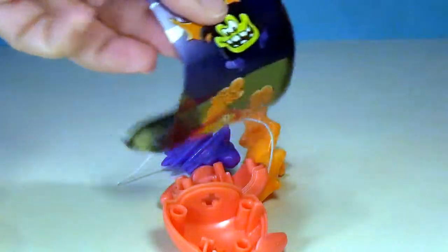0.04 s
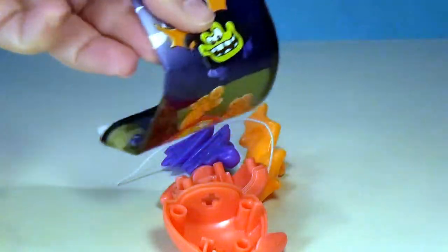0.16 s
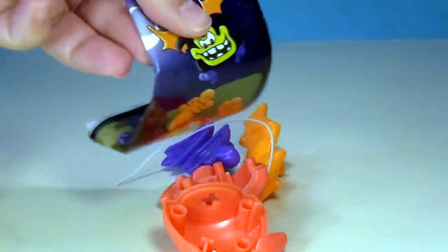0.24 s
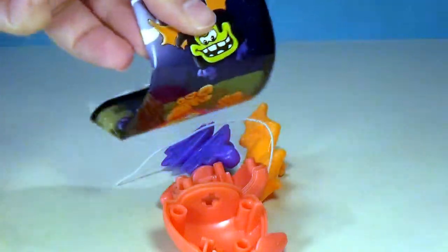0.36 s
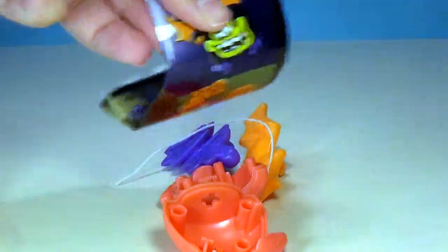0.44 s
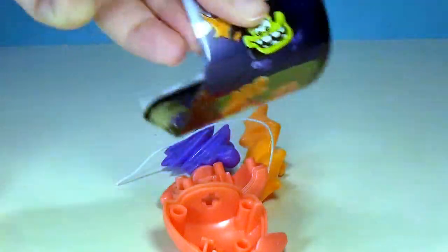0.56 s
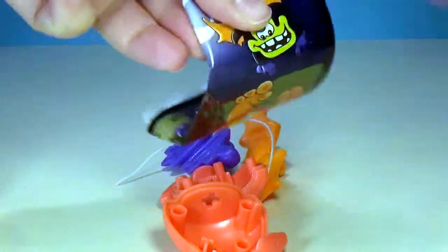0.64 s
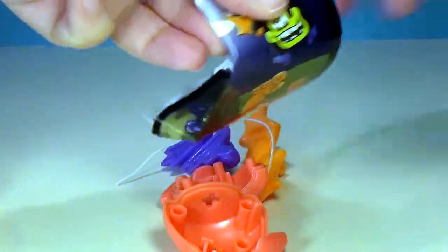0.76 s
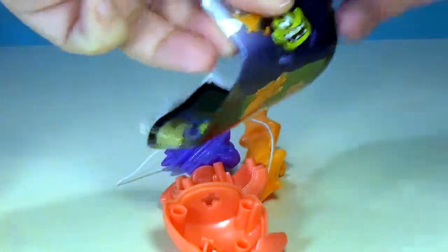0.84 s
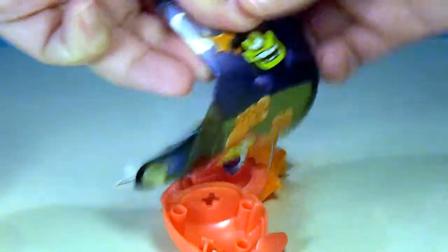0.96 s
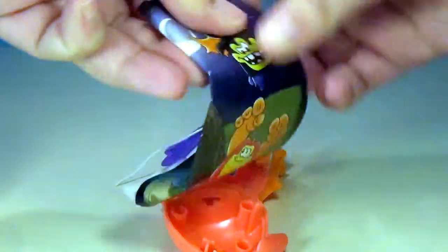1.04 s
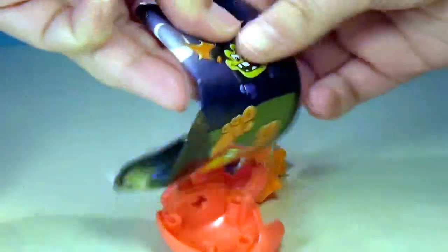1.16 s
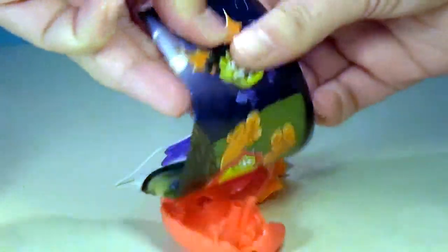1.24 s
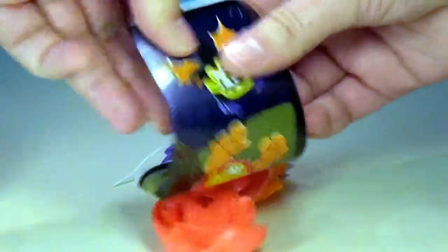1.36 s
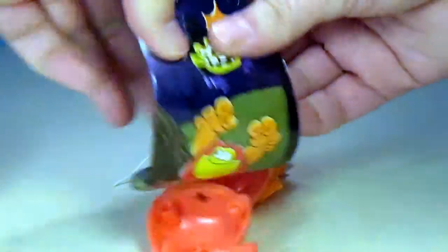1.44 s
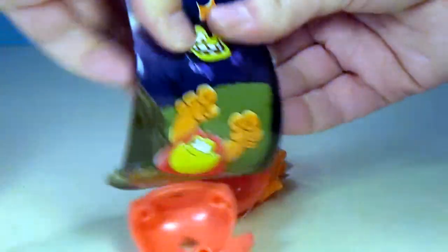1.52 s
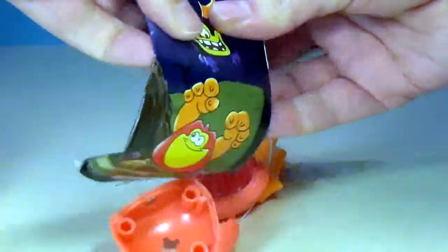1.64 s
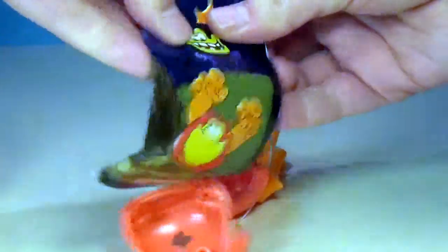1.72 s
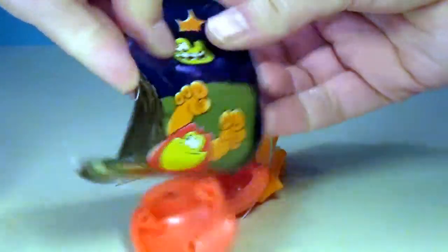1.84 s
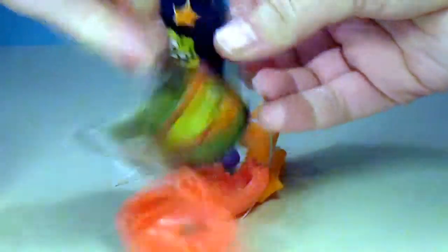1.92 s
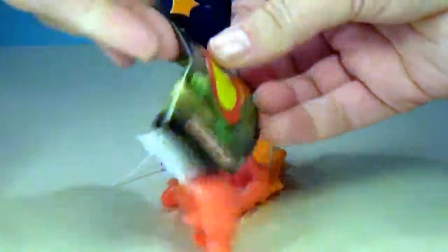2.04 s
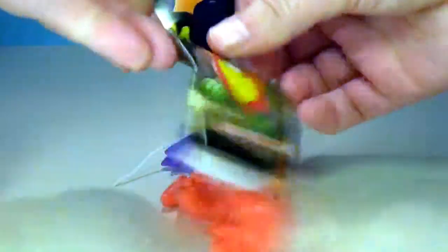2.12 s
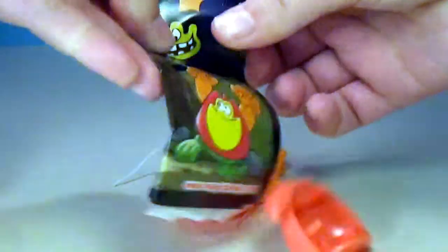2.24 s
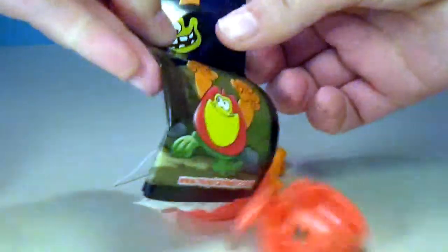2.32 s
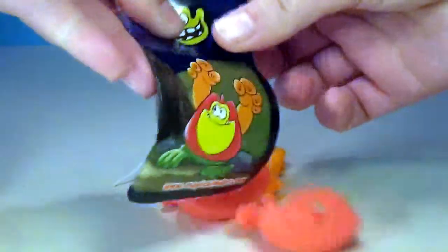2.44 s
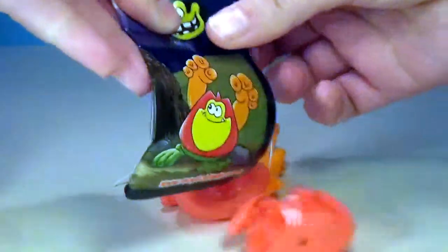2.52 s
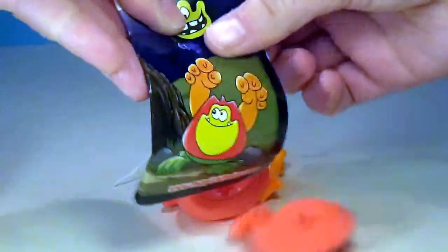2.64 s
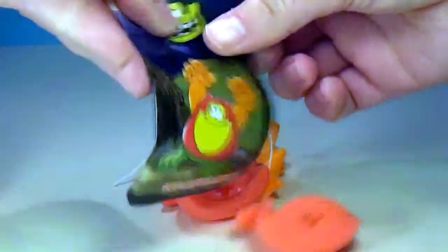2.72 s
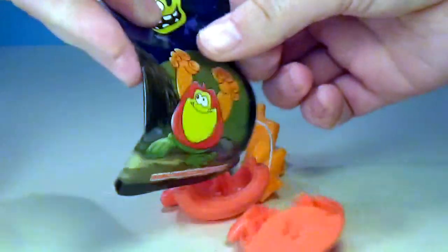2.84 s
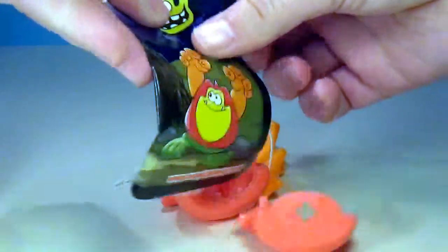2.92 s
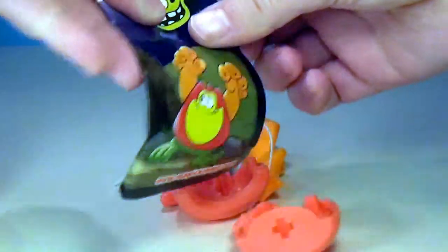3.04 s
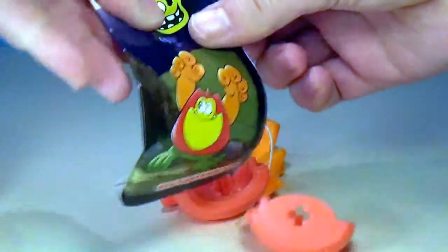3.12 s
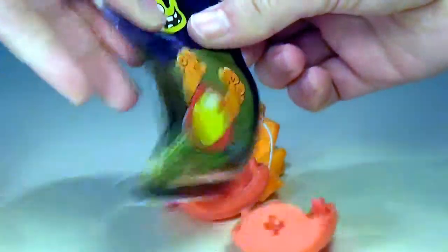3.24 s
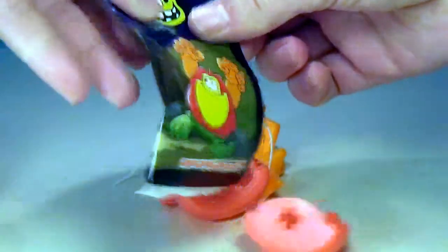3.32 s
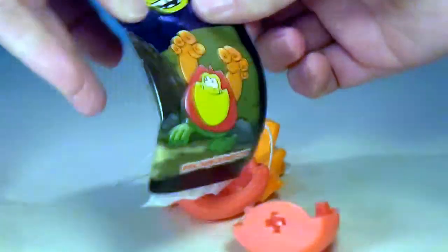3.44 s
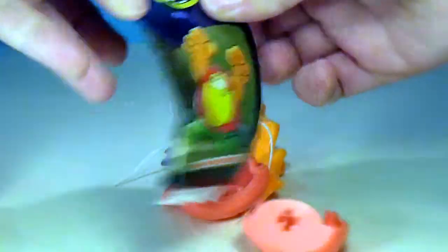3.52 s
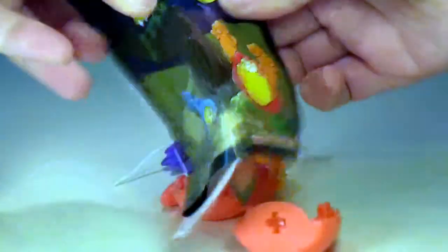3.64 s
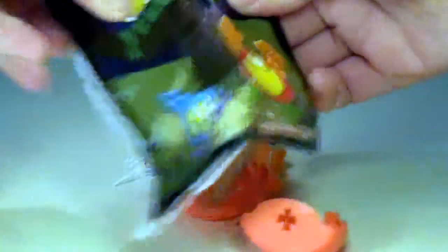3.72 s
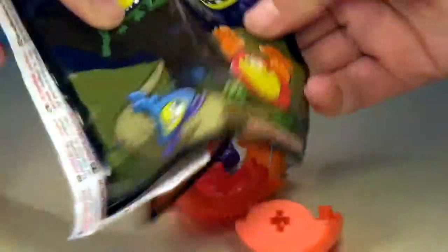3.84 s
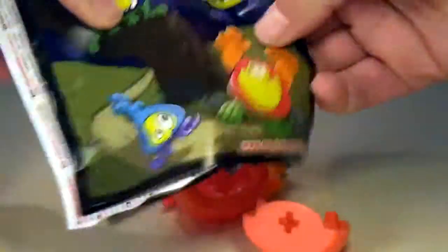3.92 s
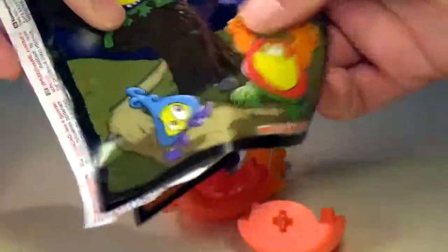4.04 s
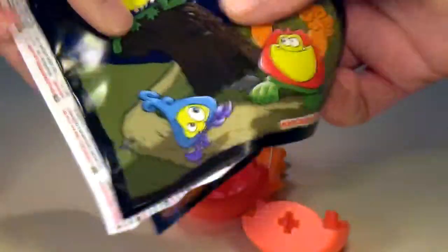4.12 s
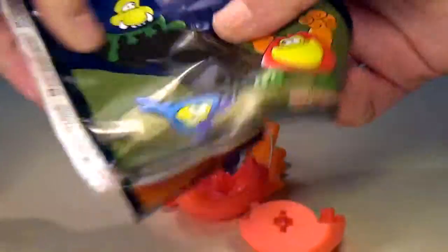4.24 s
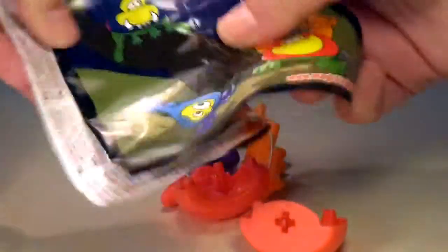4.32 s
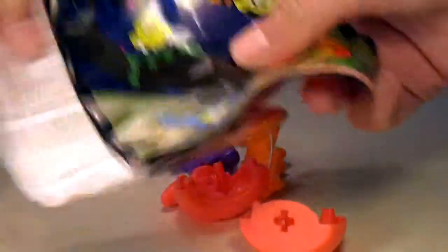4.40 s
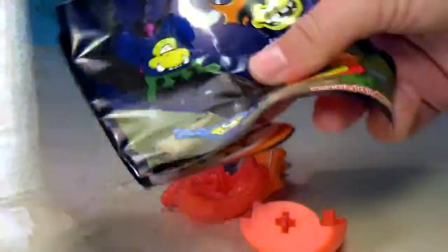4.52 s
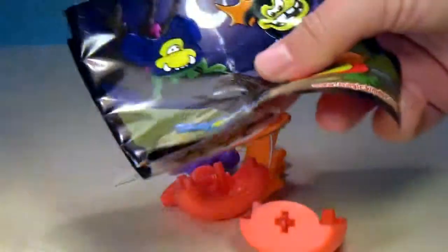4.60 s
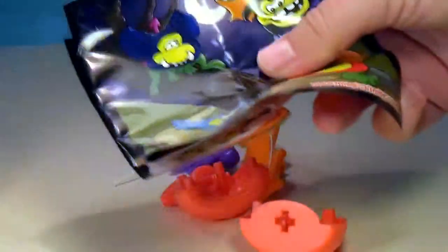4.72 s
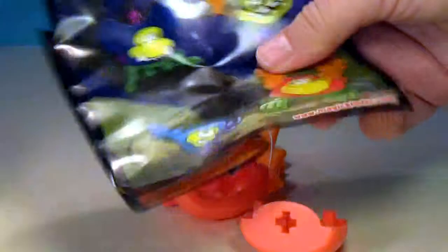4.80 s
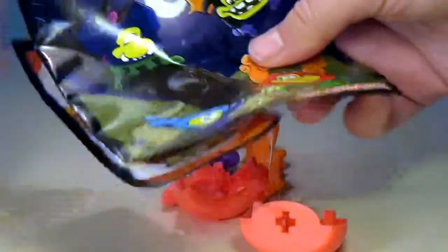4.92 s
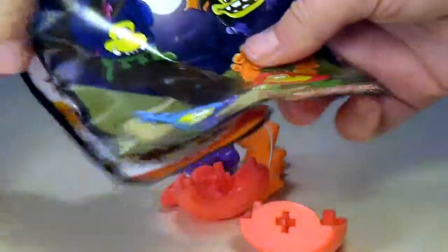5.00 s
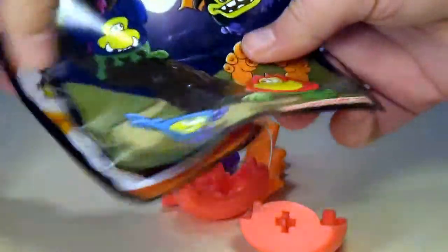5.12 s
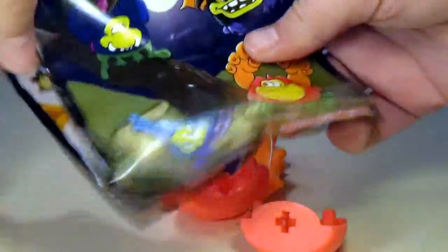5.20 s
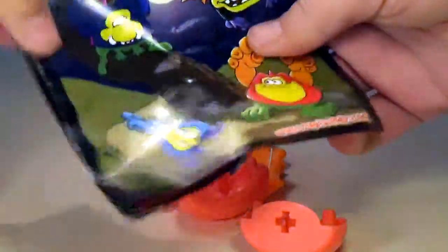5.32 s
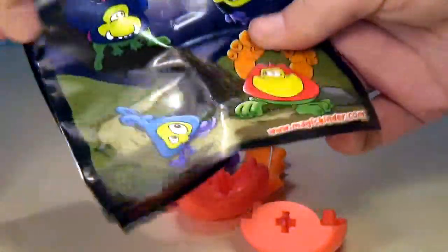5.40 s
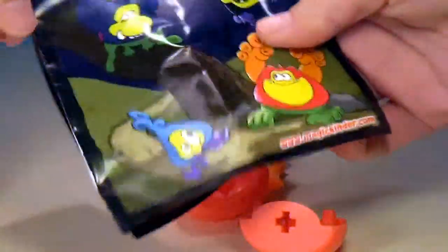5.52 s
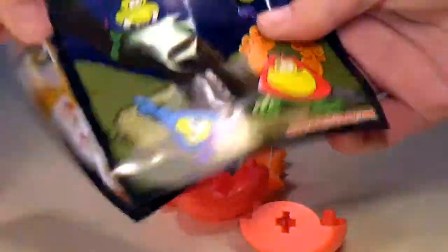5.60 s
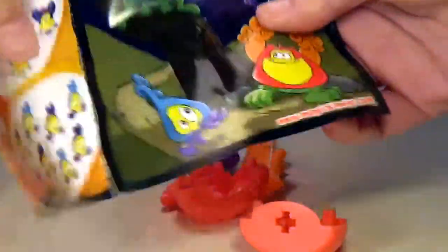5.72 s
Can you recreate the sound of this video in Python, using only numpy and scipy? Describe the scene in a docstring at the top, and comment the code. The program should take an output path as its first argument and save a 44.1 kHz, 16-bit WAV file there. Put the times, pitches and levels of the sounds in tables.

```python
"""Handling a foil-plastic bag

Hands turn and bend a stiff foil-plastic toy bag close to a small stereo microphone, over a table with toy parts.
Snapping creases and clacks are bursts of filtered noise; sliding fingers are granular friction noise.
The flexing panels and the bumps on the table are sums of damped modes.
A small room answers with decaying noise, over a faint steady hiss."""
import sys
import numpy as np
from scipy import signal
from scipy.fft import rfft, irfft, next_fast_len
from scipy.io import wavfile
from scipy.ndimage import map_coordinates

SR = 44100
rng = np.random.default_rng(int(sys.argv[2]) if len(sys.argv) > 2 else 0)


def transcribe(signal):
    """Save signal, clipped to [-1, 1], as a 16-bit WAV file at the path in sys.argv[1]."""
    frames = np.atleast_2d(signal).T
    limited = np.clip(frames, -1, 1)
    pcm = np.round(limited * 32767).astype(np.int16)
    wavfile.write(sys.argv[1], SR, pcm)


N = 254016

# creases snapping through: t/s, relative level/dB, resonance f/Hz, hollow part/dB, bright part/dB
SNAPS = [(0.35, -47.5, 2390, -5, -5), (0.497, -45, 8350, 1.5, 0), (0.547, -45, 1020, 1.5, -9),
         (0.584, -46.5, 3900, -4, 0.5), (1.012, -35, 7650, -0.5, -3.5), (1.154, -36, 5750, -1.5, -9),
         (1.306, -34.5, 1960, -3, -0.5), (1.322, -33, 1050, -0.5, -17), (1.666, -31, 3920, -7, 0),
         (1.678, -24.5, 6800, 6.5, 1), (1.8275, -13.5, 4300, -7, -7.5), (1.8536, -14.5, 6360, -15, -4),
         (1.8649, -28, 6910, 9.5, 10.5), (2.032, -18.5, 5960, 1.5, -0.5), (2.047, -26.5, 6330, 4, 6),
         (2.073, -30, 1910, -2, -5), (2.13, -34, 9800, -1, 5), (2.259, -26, 3360, -3.5, 0),
         (2.27, -33.5, 6360, 4, 7), (2.298, -30, 6200, 2, 0), (2.418, -38, 2460, 2.5, -3),
         (2.497, -35.5, 1400, 5.5, 2.5), (2.837, -23, 6900, -1, 6.5), (2.8444, -27, 7000, -13, 0),
         (2.8568, -16, 6070, -15, -3.5), (2.973, -29.5, 8100, -10, 0.5), (3.193, -35.5, 2700, -10, 0.5),
         (3.265, -35.5, 6160, -5, -3), (3.330, -29.5, 9900, -6, 0), (3.381, -30, 2330, -4, 4.5),
         (3.435, -30.5, 5900, -12, 14), (3.452, -24.5, 6830, 2, 6), (3.4831, -19.5, 5730, -4.5, -1.5),
         (3.643, -33, 9400, -1, 9.5), (3.677, -26, 6160, -5, -5), (3.6935, -12, 5900, -5.5, 0),
         (3.886, -27.5, 6350, -4, 2), (3.903, -30, 6070, -6, -7), (3.926, -29.5, 4700, -3, -6),
         (3.996, -29, 9800, 2, 3), (4.064, -29, 2400, -8, -16), (4.185, -23, 9200, -1.5, -4.5),
         (4.3486, -18.5, 2760, -4.5, -3), (4.3932, -25, 2900, 2.5, -8.5), (4.516, -30, 2680, -21, -3),
         (4.604, -30.5, 2460, 0, -3), (4.770, -38.5, 5840, -7, 6), (4.8757, -25, 3040, -27, -2),
         (4.909, -29, 7800, -17, 2), (5.083, -35.5, 9750, -7, 2.5), (5.264, -34.5, 2650, -2.5, 0),
         (5.2879, -14.5, 2650, -30, -6), (5.437, -39.5, 8350, 1, -1), (5.497, -38, 2550, -4, -12),
         (5.531, -40.5, 3510, -4, -20), (5.618, -15.5, 3120, -6.5, -9.5), (5.717, -17, 4360, -9, -9)]
REFERENCE_SNAP_DB = -16  # table level of the snap from which duration and recoil are scaled


def amp(db):
    """Level definition: an amplitude ratio is 10 to the power dB/20."""
    return 10 ** (np.asarray(db) / 20)


def unit(x):
    """Normalisation: scale to a root-mean-square value of 1."""
    return x / np.sqrt(np.mean(x ** 2) + 1e-20)


def along(points, hz):
    """Logarithmic frequency scale: interpolate (f/Hz, value) points over log frequency."""
    f, values = np.transpose(points)
    return np.interp(np.log(hz + 1), np.log(f + 1), values)


def curves(rows):
    """Linear interpolation in time: one value per sample for each column after t/s."""
    times, *columns = np.transpose(rows)
    return [np.interp(np.arange(N) / SR, times, column) for column in columns]


def wobble(rate):
    """Slow random modulation: a smooth curve through `rate` random knots per second."""
    knots = rng.standard_normal(int(N * rate / SR) + 4)
    return map_coordinates(knots, [np.arange(N) * rate / SR])


def filtered(x, response):
    """Linear filtering: multiply the spectrum of x by a response of frequency."""
    n = x.shape[-1]
    size = next_fast_len(n + 8192)
    spectrum = rfft(x, size) * response(np.fft.rfftfreq(size, 1 / SR))
    return irfft(spectrum, size)[..., :n]


def causal(gain):
    """Minimum phase: folding the cepstrum of a gain gives its causal response."""
    cepstrum = irfft(np.log(np.maximum(gain, 1e-6)))
    half = len(cepstrum) // 2
    cepstrum[1:half] *= 2
    cepstrum[half + 1:] = 0
    return np.exp(rfft(cepstrum))


def ports(pair):
    """Interchannel coherence: mix two unrelated signals to a set left-right likeness at each frequency."""
    # f/Hz, left-right correlation
    likeness = [(100, 0.75), (2000, 0.77), (3500, 0.86), (6000, 0.38), (11000, 0.47)]

    def mid_side(hz):
        angle = np.arccos(np.clip(along(likeness, hz), -1, 1)) / 2
        return np.array([np.cos(angle), np.sin(angle)])

    mid, side = filtered(pair, mid_side)
    return np.array([mid + side, mid - side])


def coloured(pair, spectrum):
    """Spectral shaping: filter a pair to the given spectrum, as stereo of rms 1."""
    return unit(ports(filtered(pair, lambda hz: amp(along(spectrum, hz)))))


def add(track, s, sound):
    """Superposition: sum a sound into a track from time s."""
    part = track[..., max(round(s * SR), 0):][..., :sound.shape[-1]]
    part += sound[..., :part.shape[-1]]


def add_centred(track, s, sound):
    """Superposition about an instant: sum a sound with its middle at time s."""
    add(track, s - sound.shape[1] / 2 / SR, sound)


def ring(modes, t, scatter):
    """Modal decay: damped sines whose pitch and strength the grip shifts at every blow."""
    total = 0
    for hz, db, t60 in modes:
        envelope = amp(db + rng.normal(0, 0.97) - 60 * t / t60)
        shifted_hz = hz * (1 + scatter * rng.normal())
        total = total + envelope * np.sin(2 * np.pi * shifted_hz * t)
    return total


def small_radiator(x, low_hz=85):
    """Radiation cut-off: small surfaces hardly radiate the deepest bass; the right channel is stronger."""
    highpass = signal.butter(2, low_hz, "highpass", fs=SR, output="sos")
    return signal.sosfilt(highpass, x) * amp([[-1.2], [1.2]])


def burst(db, rise, fall, ring_hz, hollow, bright, ring_db=5, ring_width=0.13, hollow_db=-1):
    """Transient excitation of a resonator: a noise pulse rings the film, centred in the returned sound."""
    # ringing film: f/Hz, relative spectral density/dB
    film_spectrum = [(150, -16.5), (400, -1), (650, 1), (1000, 5.5), (1300, 8), (1900, 2), (3000, 3.5),
                     (6000, 6), (9500, 3.5), (11200, 0.5)]
    sharp_share, sharp_db = 0.38, 1.5  # the upper middle partly follows the bright part
    size = 4096
    t = (np.arange(size) - size / 2) / SR
    hz = np.fft.rfftfreq(size, 1 / SR)
    core = (hz > 2200) & (hz < 6500)  # the band whose strength is set
    pulse = np.exp(-np.logaddexp(-t / rise, t / fall))
    # wide creases sound hollow, tight ones bright, and each has one strongest resonance
    tilt = [(800, min(hollow, 0)), (1400, hollow + hollow_db), (2400, 0), (3500, 0),
            (5100, sharp_db + sharp_share * bright), (8000, bright)]
    resonance = ring_db / (1 + ((hz / ring_hz - 1) / ring_width) ** 2)
    response = causal(amp(along(film_spectrum, hz) + along(tilt, hz) + resonance))
    ringing = rfft(rng.standard_normal((2, size)) * pulse) * response
    strength = np.linalg.norm(pulse) / np.linalg.norm(irfft(ringing * core), axis=1, keepdims=True)
    return amp(db) * strength * irfft(ringing)


def crinkle(rate, spread_db, grain_s, smooth):
    """Granular friction: noise of rms 1 breaks into `rate` crinkles per second over a smooth share."""
    # rubbed film: f/Hz, relative spectral density/dB
    rub_spectrum = [(250, -21), (450, -8), (900, -7.5), (1270, -8), (1900, -5), (2600, -3.5), (3400, -3),
                    (4700, -3), (6400, -1.5), (9300, -4.5), (11200, -11)]
    happens = rng.random(N) < rate / SR
    sizes = amp(spread_db * np.minimum(rng.exponential(size=N), 3.5)) * happens
    # each crinkle's power dies exponentially
    power = signal.lfilter([1], [1, -np.exp(-2 / (grain_s * SR))], sizes ** 2)
    grains = np.sqrt(power / power.mean() + smooth ** 2)
    return coloured(grains * rng.standard_normal((2, N)), rub_spectrum)


def hiss(level_db=-58.5):
    """Stationary random noise: a steady hiss of fixed spectrum."""
    # f/Hz, relative spectral density/dB
    hiss_spectrum = [(15, -34), (25, -4.5), (97, -11), (142, -3.5), (193, -3), (313, -5), (472, -16),
                     (893, -11), (1970, -15.5), (2480, -13), (3120, -18.5), (3460, -12.5), (3830, -17),
                     (8680, -33), (11200, -28), (14600, -66), (22000, -120)]
    return amp(level_db) * coloured(rng.standard_normal((2, N)), hiss_spectrum)


def room(x, wet_db=-6, gap_s=0.00065):
    """Reverberation: convolution with decaying noise, redrawn each quarter second as the bag is held elsewhere."""
    # f/Hz, relative reflected level/dB
    reflected = [(80, 3), (300, 2), (1200, 0.5), (3000, -6), (11000, 2)]
    # f/Hz, t60/s
    reverberation = [(150, 0.15), (1000, 0.22), (4000, 0.41), (11000, 0.22)]
    out, hop = np.zeros((2, N)), SR // 4
    for start in range(0, N, hop):
        hz, t, noise = signal.stft(rng.standard_normal((2, SR // 2)), SR, nperseg=256)
        decay_db = along(reflected, hz)[:, None] - 60 * t / along(reverberation, hz)[:, None]
        decay = amp(decay_db) * (1 - np.exp(-t / gap_s))
        tail = signal.istft(noise * decay, SR, nperseg=256)[1]
        tail = tail / np.linalg.norm(tail[0])
        slice_in = x.mean(0)[None, start:start + hop]
        add(out, start / SR, signal.fftconvolve(slice_in, tail, axes=1))
    return amp(wet_db) * ports(out)


def table_bumps(knock_db=-2, attack_s=0.0013):
    """Impact on heavily damped bodies: bag and toy parts give a dead thud and a knock on the table."""
    # t/s, relative thud level/dB, relative knock level/dB
    blows = [(0.582, -46, -38), (0.847, -65, -32.5), (0.864, -34, -27.5), (1.328, -45, -27.5),
             (1.853, -35, -24), (2.032, -24, -23), (2.046, -32, -28), (2.075, -21, -26), (2.106, -34, -42),
             (2.13, -37, -48), (2.152, -31, -42), (2.172, -33, -37), (2.271, -31, -28), (2.306, -32.5, -37),
             (2.835, -44, -24), (3.904, -35, -34)]
    # the table's dead low modes: f/Hz, relative level/dB, t60/s
    table_modes = [(100, -3, .028), (155, -3, .025)]
    # small parts on the table top: f/Hz, relative level/dB, t60/s
    knock_modes = [(399, 6.5, 0.0073), (520, -8, 0.011), (786, -12.5, 0.042)]
    out, t = np.zeros(N), np.arange(SR // 5) / SR
    for s, thud, knock in blows:
        blow = amp(thud) * ring(table_modes, t, scatter=0.08)
        blow = blow + amp(knock + knock_db) * ring(knock_modes, t, scatter=0.08)
        add(out, s, blow * (1 - np.exp(-t / attack_s)))
    return small_radiator(out)


def panel_flex(panel_db=-3, flex_s=0.0027):
    """Plate modes: finger pushes and the recoil of each snap give the panel a short hollow note."""
    # firm finger pushes: t/s, relative level/dB
    pushes = [(1.343, -38.5), (1.372, -37), (2.031, -23.5), (2.073, -27), (3.856, -24), (3.996, -23),
              (4.201, -26), (4.299, -34), (4.33, -32), (4.345, -25.5), (4.606, -32), (5.265, -30),
              (5.436, -31)]
    # the bag's hollow modes: f/Hz, relative level/dB, t60/s
    panel_modes = [(256, -10, 0.04), (298.2, 4, 0.047), (380, -20.5, 0.012)]
    kick_db, kick_grows = -32.5, 0.54  # recoil from the reference snap; dB more per dB of snap
    out, t = np.zeros(N), np.arange(SR // 5) / SR
    recoils = [(s, kick_db + kick_grows * (db - REFERENCE_SNAP_DB)) for s, db, *_ in SNAPS]
    for s, db in pushes + recoils:
        note = ring(panel_modes, t, scatter=0.027) * (1 - np.exp(-t / flex_s))
        add(out, s, amp(db + panel_db) * note)
    return small_radiator(out)


def rustle(level_db=-2.0, flutter_db=1, rumble_db=1.0, lumps_db=2, bright_db=0.5):
    """Sliding friction: fingers rub the film lightly all along, and the panels rumble with them."""
    # t/s, relative rustle level/dB, relative panel rumble level/dB
    rubbing = [(0.0, -62, -76), (0.38, -64.5, -82), (0.93, -63, -69), (1.23, -51.5, -58.5), (1.6, -57, -70),
               (1.76, -57, -71), (2.0, -47, -55), (2.26, -46.5, -58.5), (2.55, -52, -57),
               (2.92, -57.5, -55.5), (3.24, -53.5, -62), (3.42, -49.5, -59), (3.9, -46, -52.5),
               (4.17, -46.5, -53), (4.46, -45.5, -59.5), (4.67, -50.5, -57), (5.21, -53.5, -56),
               (5.76, -49, -54)]
    # f/Hz, relative spectral density/dB
    rumble_spectrum = [(18, -50), (30, -13.5), (184, -1), (226, -4.5), (303, -3), (342, -2.5), (379, -20.5),
                       (473, -5), (601, -14), (666, -9), (988, -16), (1260, -6), (1520, -39), (1800, -17),
                       (2340, -32), (3960, -120)]
    rub_db, panel_db = curves(rubbing)
    film = crinkle(rate=350, spread_db=4, grain_s=0.0026, smooth=0.77)
    treble = filtered(film, lambda hz: hz ** 4 / (hz ** 4 + 4500 ** 4))
    film = film + (amp(bright_db) - 1) * treble
    film = film * amp(rub_db + level_db + flutter_db * wobble(35))
    rumble = coloured(rng.standard_normal((2, N)), rumble_spectrum)
    rumble = unit(rumble * amp(lumps_db * wobble(30)))
    return film + rumble * amp(panel_db + rumble_db) * amp([[-1], [1]])


def strokes(level_db=-2, edge_s=0.0039, slip_hz=95, slip_db=2.0):
    """Stick-slip friction: a firmer grip drags the film unevenly in short spells of dense crinkling."""
    # t/s (start), length/s, relative level/dB
    spells = [(0.779, 0.13, -54), (1.098, 0.091, -46.5), (1.257, 0.089, -45.5), (1.866, 0.064, -38.5),
              (2.03, 0.067, -38), (2.133, 0.037, -46), (2.278, 0.024, -44), (2.365, 0.026, -36),
              (2.489, 0.069, -39), (3.391, 0.11, -41), (3.685, 0.043, -32.5), (3.823, 0.095, -39.5),
              (4.298, 0.043, -42), (4.443, 0.15, -44), (4.874, 0.059, -40.5), (5.271, 0.069, -38.5)]
    t, grip = np.arange(N) / SR, np.zeros(N)
    for s, length, db in spells:
        grip += amp(db) * (np.tanh((t - s) / edge_s) - np.tanh((t - s - length) / edge_s)) / 2
    # the slip rate wanders about slip_hz
    cycle = np.cumsum(slip_hz * np.exp(0.48 * wobble(66))) / SR
    slips = unit(amp(slip_db * np.cos(2 * np.pi * cycle)))
    return amp(level_db) * grip * slips * crinkle(rate=400, spread_db=3.5, grain_s=0.0021, smooth=0.82)


def clacks(crack_db=-2.0, hollow_db=-3, attack_s=0.00055, pan_db=0.5):
    """Impulse and modal response: stiff plastic gives a short crack over a dull hollow tock."""
    # t/s, relative crack level/dB, relative tock level/dB, bright part/dB
    clack_events = [(2.016, -27, -32, -9), (2.745, -39.5, -34, -27), (2.8338, -25, -15, -4),
                    (3.2475, -38.5, -42, -33), (4.3305, -18.5, -27, -4), (4.684, -32.5, -32.5, -19),
                    (5.5795, -24.5, -25, -39)]
    # what every clack rings with: f/Hz, relative level/dB, t60/s
    tock_modes = [(1268, 0, .011), (1595, -3.5, 0.011)]
    cracks, tocks, t = np.zeros((2, N)), np.zeros(N), np.arange(SR // 20) / SR
    for s, db, tock_db, bright in clack_events:
        crack = burst(db + crack_db, rise=0.00072, fall=0.0018, ring_hz=1300, hollow=hollow_db, bright=bright)
        add_centred(cracks, s, crack)
        tock = ring(tock_modes, t, scatter=0.047) * (1 - np.exp(-t / attack_s))
        add(tocks, s, amp(tock_db) * tock)
    return (ports(cracks) + tocks) * amp([[pan_db / 2], [-pan_db / 2]])


def snaps(level_db=-2.5, pan_db=0.5):
    """Snap-through buckling: creases flip from one stable shape to another, the harder the quicker."""
    fall_s, rise_s = 0.003, 0.00036  # time constants of the reference snap
    doubling_db = 19  # a snap this much weaker falls twice as long
    rise_grows = 1.4  # power of the fall time that the rise time follows
    out = np.zeros((2, N))
    for s, db, ring_hz, hollow, bright in SNAPS:
        stretch = 2 ** ((REFERENCE_SNAP_DB - db) / doubling_db)
        rise, fall = rise_s * stretch ** rise_grows, fall_s * stretch
        add_centred(out, s, burst(db + level_db, rise, fall, ring_hz, hollow, bright))
    return ports(out) * amp([[pan_db / 2], [-pan_db / 2]])


def scene():
    """Superposition of sources: the handled bag and its room's answer over steady hiss."""
    handling = table_bumps() + panel_flex() + rustle() + strokes() + clacks() + snaps()
    return hiss() + room(handling) + handling


def record(dry, top_hz=11130):
    """Resonant coloration and band limiting: the microphone housing's peaks and dips, then a steep cut-off."""
    # housing resonances: centre f/Hz, width/Hz, level change/dB
    housing_modes = [(1367, 190, 3), (1990, 88, -2), (2558, 360, 4.5), (3290, 63, 4.5)]

    def housing(hz):
        return amp(sum(db / (1 + (2 * (hz - centre) / width) ** 2) for centre, width, db in housing_modes))

    return filtered(filtered(dry, housing), lambda hz: 1 / np.sqrt(1 + (hz / top_hz) ** 200))


dry = scene()
out = record(dry)
transcribe(out)
```